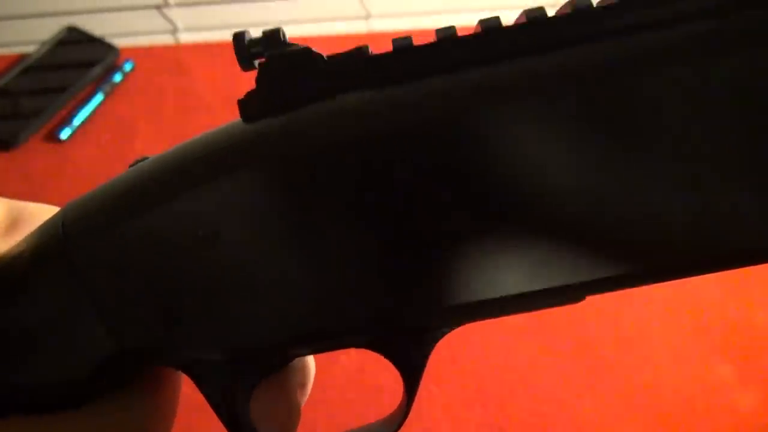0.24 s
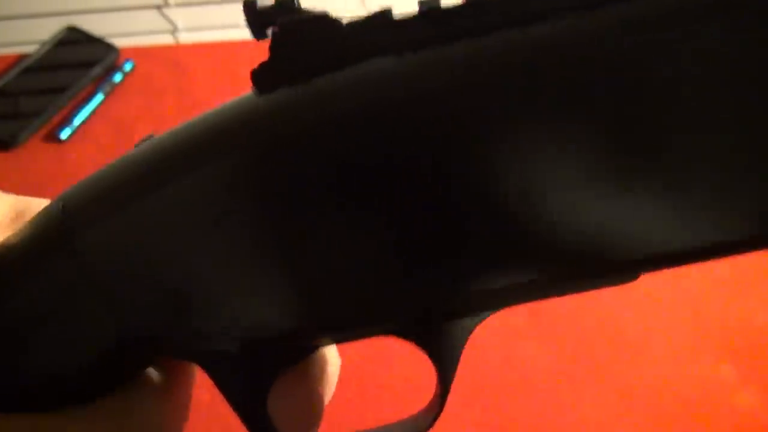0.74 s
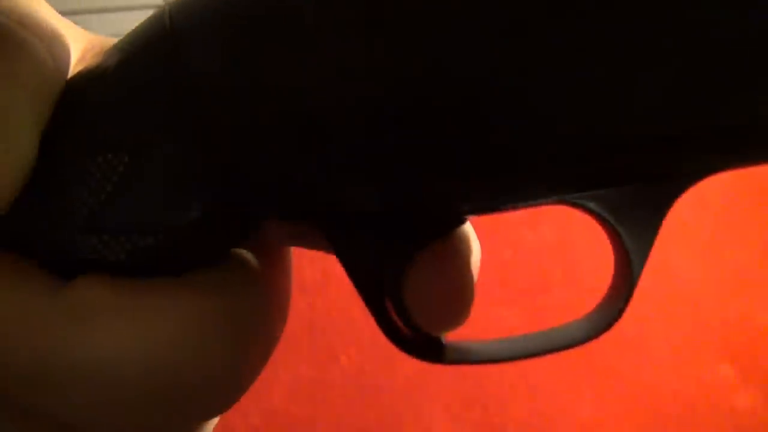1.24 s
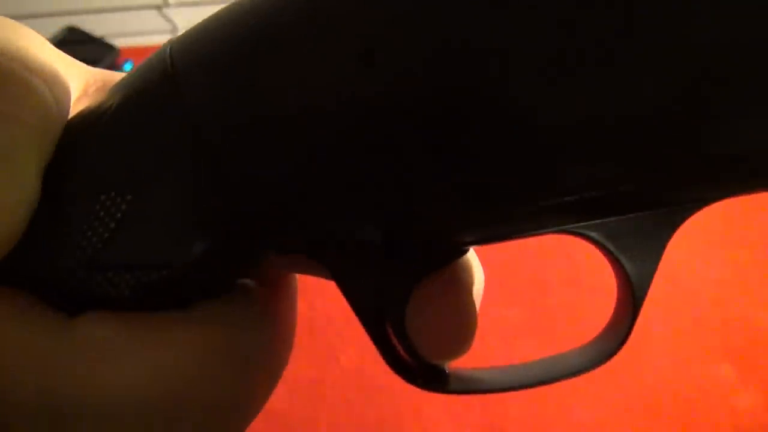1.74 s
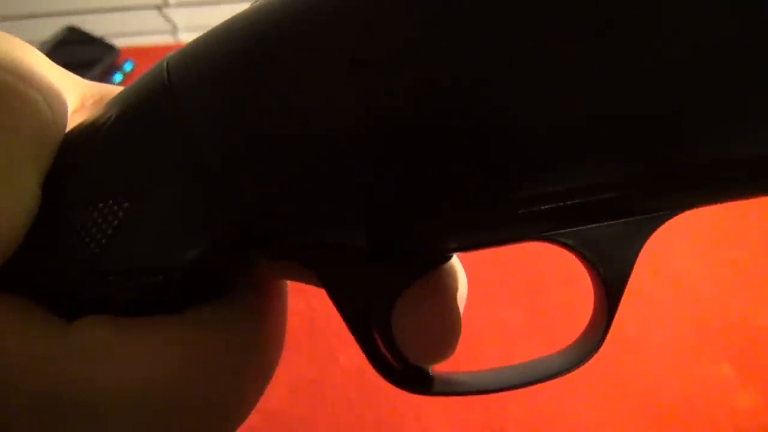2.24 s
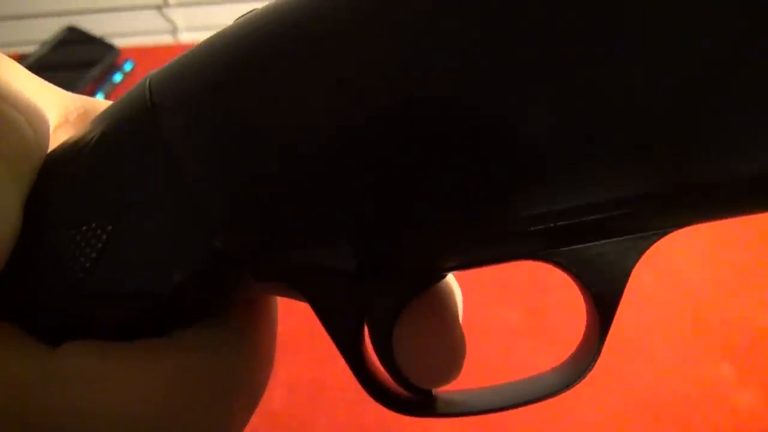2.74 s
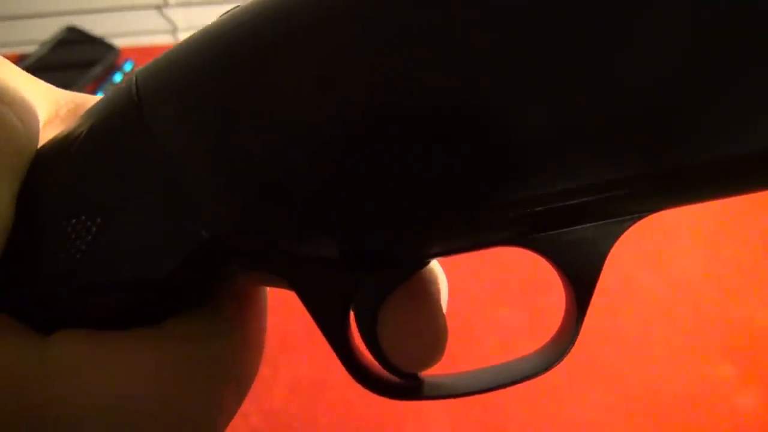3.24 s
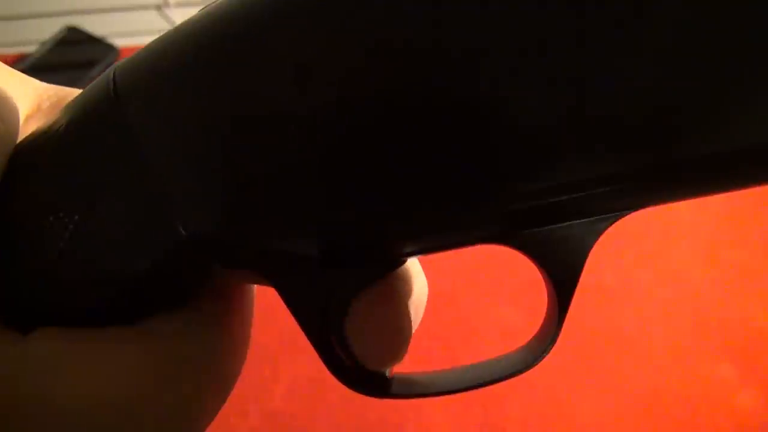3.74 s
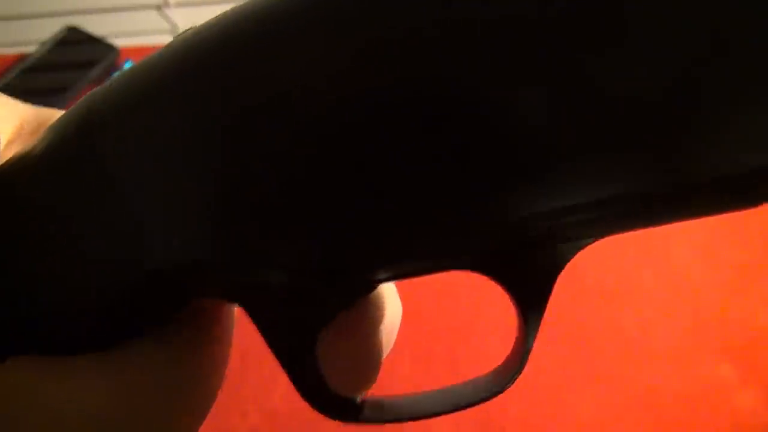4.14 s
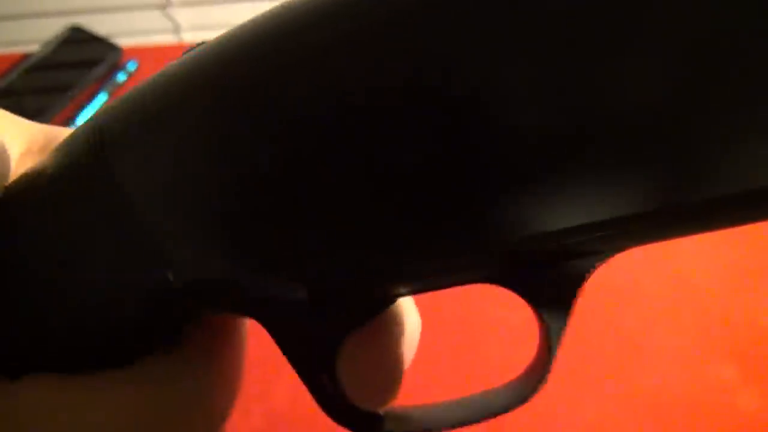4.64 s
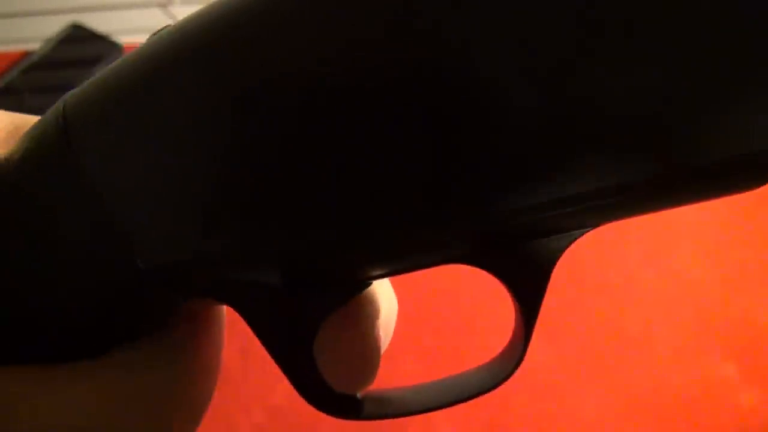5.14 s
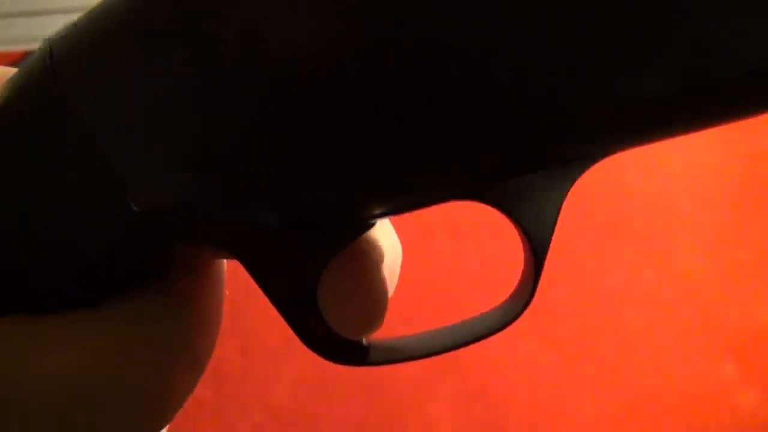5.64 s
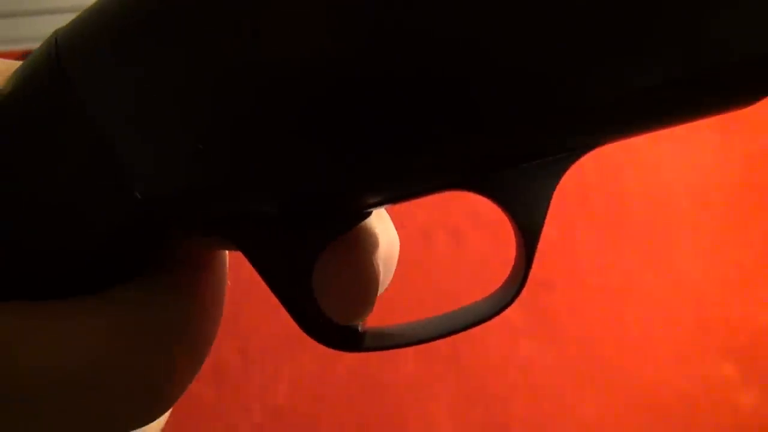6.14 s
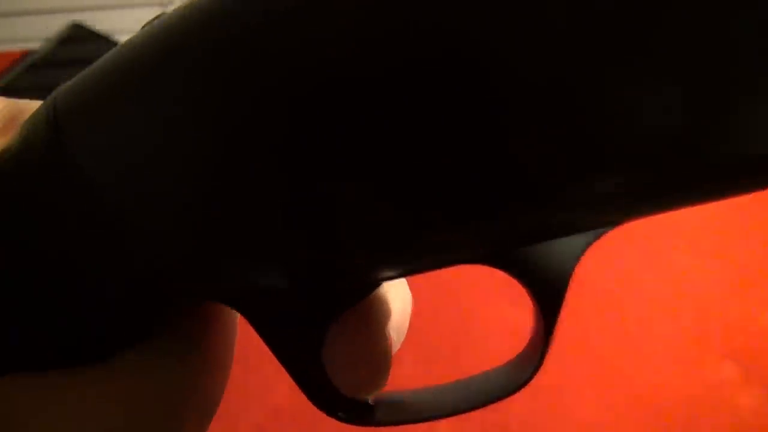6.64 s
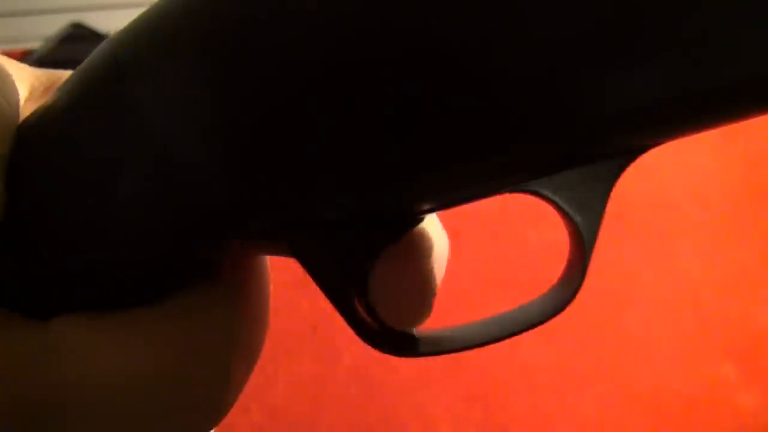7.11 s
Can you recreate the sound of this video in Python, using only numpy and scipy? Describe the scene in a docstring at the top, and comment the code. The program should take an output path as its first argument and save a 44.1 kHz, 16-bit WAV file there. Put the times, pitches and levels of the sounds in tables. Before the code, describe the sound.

A pump-action shotgun is handled close to a phone in a small hard room with a faint noise floor. After tiny finger taps, the first rack begins at 0.2 s: rattling catches and a grainy scrape, a rear slam at 0.4, a tick at 0.5, then a forward run locking with a bright ping at 0.67. Steel and room ring away into quiet. At 2.9 a very short, crisp safety click; a soft bump at 3.5, then at 3.7 the hammer falls on an empty chamber, a hard, ringing clack. The second rack runs from 4.15, slamming back at 4.4 and locking at 4.7. A safety click comes at 5.7, light taps at 5.9, another hammer fall at 6.04. The last rack is slower: unlocking at 6.5, rear slam at 6.8, lock at 7.27. Dense echo follows each blow; the loudest hits sound flattened.

```python
"""A pump-action shotgun is racked three times and, in between, twice taken off safe and dry-fired in a small
hard room, close to a phone. Catches tick and knock, the bolt slams back and locks forward, the hammer falls:
bursts of coloured, fast-decaying noise. The fore-end rubs its tube as a grainy hiss, steel and room modes ring
as damped sines, and a dense echo answers over a faint noise floor. The phone's limiter flattens the loud blows."""
import sys
import numpy as np
from scipy import signal
from scipy.fft import rfft, irfft, next_fast_len
from scipy.io import wavfile
from scipy.ndimage import uniform_filter1d

SR = 44100
rng = np.random.default_rng(int(sys.argv[2]) if len(sys.argv) > 2 else 0)


def transcribe(signal):
    """Save signal, clipped to [-1, 1], as a 16-bit WAV file at the path in sys.argv[1]."""
    frames = np.atleast_2d(signal).T
    limited = np.clip(frames, -1, 1)
    pcm = np.round(limited * 32767).astype(np.int16)
    wavfile.write(sys.argv[1], SR, pcm)


N = 325235
ATTACK = int(.005 * SR)  # the 5 ms over which a contact's level is set
BLOW = np.arange(8192) / SR  # time axis of one contact, in seconds


def undb(db):
    """Decibels to gain."""
    return 10 ** (np.asarray(db) / 20)


def fade(t, t60):
    """Exponential decay that loses 60 dB in t60 seconds."""
    return np.exp(-np.log(1000) * t / max(abs(t60), 1e-3))


def gains(points, n):
    """A colour curve of (Hz, dB) points as gains on the bins of an n-point spectrum."""
    hz, db = np.transpose(points)
    bins = np.log(np.fft.rfftfreq(n, 1 / SR) + 1)
    return undb(np.interp(bins, np.log(hz), db))


# Stereo width. Each row: frequency in Hz, side over mid in dB.
STEREO_WIDTH = [(50, -0.5), (150, -9.5), (350, -15.5), (900, -21), (1500, -18), (2800, -22), (4500, -15.5),
                (7000, -5.5), (9500, -7), (13000, -22.5)]


def noise(points, n):
    """Coloured stereo noise of rms 1, as wide as the two microphones hear it."""
    mid, side = rfft(rng.standard_normal((2, n))) * gains(points, n)
    side = side * gains(STEREO_WIDTH, n)
    x = irfft(np.array([mid + side, mid - side]), n)
    return x / x.std()


def add(out, s, x):
    """Mix x into out from time s (seconds) on."""
    i = max(int(s * SR), 0)
    out[..., i:i + x.shape[-1]] += x[..., :max(N - i, 0)]


def mode(hz, t60):
    """One damped resonance: a decaying sine."""
    t = np.arange(32768) / SR
    return fade(t, t60) * np.sin(2 * np.pi * hz * t)


def burst(points, t60, rise_s=0.00042, damping=3):
    """A contact: countless damped modes, with the energy of a decay whose first 5 ms have rms 1."""
    shape = fade(BLOW, t60) * (1 - np.exp(-BLOW / rise_s))
    shape = shape / np.sqrt(np.mean(shape[:ATTACK] ** 2))
    # the modes have random phases, but their strengths follow the colour of the contact
    phases = np.angle(rfft(noise(points, len(BLOW)) * shape))
    x = irfft(gains(points, len(BLOW)) * np.exp(1j * phases))
    x = x * fade(BLOW, damping * t60)
    energy = np.sum(np.mean(x ** 2, axis=0))
    return x * np.sqrt(np.sum(shape ** 2) / energy)


def stress(x, hz, width_hz, lift_db):
    """Lift one resonance of a sound and keep its energy."""
    b, a = signal.iirpeak(hz, hz / width_hz, fs=SR)
    y = x + undb(lift_db) * signal.lfilter(b, a, x)
    return y * x.std() / y.std()


# Colour of the noise floor. Each row: frequency in Hz, relative level in dB.
FLOOR_COLOUR = [(12, -37), (20, -13), (112, -3.5), (144, -7.5), (196, -2), (298, -8), (342, -3.5),
                (478, -11), (985, -16.5), (1500, -11.5), (1720, -18), (2400, -19), (3080, -22.5),
                (3450, -22.5), (15500, -25)]


def quiet_floor(level_db=-59.5):
    """The steady background: faint coloured noise."""
    return undb(level_db) * noise(FLOOR_COLOUR, next_fast_len(N))[:, :N]


# The room's echo by band. Each row: centre in Hz, echo gain in dB, t60 in seconds.
ROOM_BANDS = [(60.3, -21, .3), (166, -13, 0.15), (308, 4, 0.46), (570.4, 4, 0.51), (1230, 0, 0.47),
              (2430, -1, 0.42), (4904, -1, 0.48), (9000, -1, 0.31), (14900, -4, 0.068)]


def room(x, build_s=0.0028, size=32768):
    """A dense echo that builds as the walls answer; each band dies at its own pace, the very top first."""
    t = np.arange(size) / SR
    centres = np.log([row[0] for row in ROOM_BANDS])
    bins = np.log(np.fft.rfftfreq(size, 1 / SR) + 1)
    white = rfft(noise([(1, 0), (SR, 0)], size))
    echo = 0
    for band, (_, db, t60) in zip(np.eye(len(ROOM_BANDS)), ROOM_BANDS):
        shape = fade(t, t60) * (1 - np.exp(-(t / build_s) ** 2))
        shape = shape / np.linalg.norm(shape)
        band_noise = irfft(white * np.interp(bins, centres, band))
        echo = echo + undb(db) * band_noise * shape
    mono = x.mean(axis=0)[None]
    return signal.fftconvolve(mono, echo, axes=1)[:, :N]


# Low room modes set off around unlocking and locking. Each row: start in seconds, note in Hz, level in dB.
ROOM_BOOMS = [(0.236, 319, -27), (.70, 351.3, -21), (4.201, 324, -30.5), (4.742, 351, -21),
              (6.515, 316, -40.5), (7.292, 346.5, -21.5)]


def room_booms(t60=.3, swell_t60=0.032):
    """The room's low modes swell up and ring on around unlocking and locking."""
    out = np.zeros(N)
    for s, hz, db in ROOM_BOOMS:
        # a shorter copy taken away leaves a soft onset
        add(out, s, undb(db) * (mode(hz, t60) - mode(hz, swell_t60)))
    return out


# The hands bump softly on the stock. Each row: start in seconds, note in Hz, level in dB.
STOCK_BUMPS = [(1.335, 333, -53.5), (3.507, 380, -43), (5.857, 208, -42)]


def bumps(t60=0.047):
    """Dull, short notes of the stock under the hands."""
    out = np.zeros(N)
    for s, hz, db in STOCK_BUMPS:
        add(out, s, undb(db) * mode(hz, t60))
    return out


# Colour of the pushed air. Each row: frequency in Hz, relative level in dB.
THUMP_COLOUR = [(15, -11), (35, 0), (80, -10), (160, -12.5), (300, -22), (800, -56.5)]


def thumps(t60=0.016, catch_db=-30):
    """Each jolt of the gun pushes the air beside the phone: hard at the heavy blows, slightly at every catch."""
    out = np.zeros((2, N))
    for s, _, _, jolt_db, *_ in HAMMER_FALLS + REAR_STOPS + LOCKUPS:
        add(out, s, undb(jolt_db) * burst(THUMP_COLOUR, t60))
    for s, db, *_ in contacts():
        add(out, s, undb(db + catch_db) * burst(THUMP_COLOUR, t60))
    return out


# Colour of the sliding fore-end. Each row: frequency in Hz, relative level in dB.
SCRAPE_COLOUR = [(20, -31), (120, -24.5), (330, -12), (600, -13.5), (1100, -4.5), (1600, -4.5),
                 (2300, -0.5), (3000, 0), (4200, -9.5), (6000, -6.5), (9000, -19.5)]


def slide(rate=700, spread_db=6, grain_t60=0.0089, treble_db=-10):
    """Steel scrapes on steel: dense tiny slips of uneven size, about rate per second."""
    sizes = undb(spread_db * np.minimum(rng.standard_normal(N), 2))
    slips = (rng.random(N) < rate / SR) * sizes
    grain = signal.fftconvolve(slips, fade(BLOW, grain_t60))[:N]
    grain = grain / np.sqrt(np.mean(grain ** 2))
    size = next_fast_len(N)
    scrape = noise(SCRAPE_COLOUR, size) + undb(treble_db) * noise(SMALL_PARTS_COLOUR, size)
    return scrape[:, :N] * grain * rubbing()


def swell(start, length, rise_t60, fall_t60):
    """An envelope that rises up to start, holds for length and dies away."""
    t = np.arange(N) / SR - start
    return fade(np.maximum(-t, 0), rise_t60) * fade(np.maximum(t - length, 0), fall_t60)


def rubbing(rise_t60=0.053, fall_t60=0.21, rear_db=-14, rear_hold_s=0.042, rear_t60=0.26,
            lock_db=-11, lock_hold_s=0.047, lock_t60=0.096):
    """How hard the fore-end rubs its tube: steadily through each movement, with a surge at each end stop."""
    power = np.zeros(N)
    for start, end, *_, scrape_db in UNLOCK_MOVES + PULL_MOVES + LIFT_MOVES + PUSH_MOVES:
        power += (undb(scrape_db) * swell(start, end - start, rise_t60, fall_t60)) ** 2
    surges = ((REAR_STOPS, rear_db, rear_hold_s, rear_t60), (LOCKUPS, lock_db, lock_hold_s, lock_t60))
    for stops, share_db, hold_s, t60 in surges:
        for s, db, *_ in stops:
            power += (undb(db + share_db) * swell(s, hold_s, rise_t60, t60)) ** 2
    return np.sqrt(power)


# The safety snaps over. Each row: start in seconds, level in dB, nominal t60 of the crack in seconds,
# ring of the receiver in dB.
SAFETY_SNAPS = [(2.9354, -13, .004, -68), (5.7122, -17, .009, -53)]
# Colours of the crack and of the parts that shiver around it. Each row: frequency in Hz, relative level in dB.
SAFETY_COLOUR = [(300, -53), (620, -31), (850, -3.5), (1700, -17.5), (3300, -1), (4200, -6), (5100, 5.5),
                 (6000, -5), (7200, 9.5), (9100, -1), (10200, 10.5), (11200, 10), (12500, 3),
                 (15500, -10.5)]
SHIVER_COLOUR = [(300, -43), (700, -17), (950, -7.5), (1600, -4), (3200, -5.5), (5100, -2), (7200, -2.5),
                 (9500, -9.5), (15500, -11.5)]


def safety(ring_hz=1055, ring_t60=0.89, shiver_db=-14, shiver_t60=0.081):
    """A detent snaps: a very short crack; the parts around it shiver and the receiver rings faintly."""
    cracks, shivers = np.zeros((2, 2, N))
    for s, db, t60, ring_db in SAFETY_SNAPS:
        add(cracks, s, undb(db) * burst(SAFETY_COLOUR, t60, damping=14.0))
        add(shivers, s, undb(db + shiver_db) * burst(SHIVER_COLOUR, shiver_t60))
        add(shivers, s, undb(ring_db) * mode(ring_hz, ring_t60))
    return cracks, shivers


# Every racking is the same four movements: unlock, pull back, tip the carrier, push forward.
# Each movement trips the same catches in the same order; only its speed and force differ.
# Each row: start in seconds, end in seconds, force in dB, easing (under 1 speeds up), scrape in dB.
UNLOCK_MOVES = [(0.2072, .2508, 1.2, .92, -24), (4.1588, 4.2035, 1, 1.13, -25),
                (6.4765, 6.5251, -2.2, 1.0, -34.5)]
PULL_MOVES = [(0.289, 0.3658, 0.28, 0.97, -29), (4.2756, 4.348, 1.7, .76, -39.5),
              (6.6752, 6.7646, -1.5, 1.06, -34)]
LIFT_MOVES = [(.386, 0.398, -1, 1.0, -26.5), (4.368, 4.382, 1.5, 0.93, -25),
              (6.7856, 6.809, -1.2, 0.98, -22.5)]
PUSH_MOVES = [(0.5568, 0.6548, 0.012, .9, -27.5), (4.5517, 4.6847, 0.00098, 1.04, -28.5),
              (7.1102, 7.2482, 0.0047, 1.01, -30)]
# Catches along each movement. Each row: relative place from start to end, level in dB before force,
# treble over body in dB, nominal t60 in seconds, nominal note in Hz, ping in Hz.
CATCHES_UNLOCKING = [(0, -12.5, -5, 0.028, 1800, 6300), (.22, -15.5, 1, 0.02, 1900, 11200),
                     (0.461, -15, 6, 0.019, 1660, 9900), (.78, -19, 3.5, .022, 1600, 9600),
                     (1.001, -19, -3, .013, 1700, 7000)]
CATCHES_PULLING = [(0, -15.5, 1, 0.014, 2640, 9500), (.296, -15.5, 8, .012, 1883, 10050),
                   (.525, -19.5, -12.5, 0.014, 2670, 6000), (.79, -17.5, 12.5, .009, 2490, 10400),
                   (0.999, -16, 18, 0.0068, 2820, 8140)]
CATCHES_LIFTING = [(0, -20.5, -8.5, .015, 2090, 6100), (.53, -15, 0, .028, 2400, 10500),
                   (1, -14.5, -2, .022, 2200, 7000)]
CATCHES_PUSHING = [(0, -15, 0.5, 0.044, 2100, 7000), (.23, -15.5, -5, 0.014, 1100, 11000),
                   (.38, -22, 4, .018, 2600, 10300), (.595, -16.5, -4, 0.012, 2250, 11000),
                   (.738, -17.5, 2, .011, 2550, 6200), (1.001, -11.5, -9, .01, 2300, 6000)]
# Trigger, sear and strut let go just before the hammer lands. Each row: lead in seconds, level in dB,
# treble over body in dB, nominal t60 in seconds, nominal note in Hz, ping in Hz.
TRIGGER_RELEASE = [(0.02, -29.5, -25.5, 0.02, 1200, 5300), (.0075, -20.5, -8, .03, 930, 6300),
                   (.0036, -7.5, 5.5, 0.015, 1170, 12000)]
# Lone taps of fingers and loose parts. Each row: start in seconds, level in dB, treble over body in dB,
# nominal t60 in seconds, nominal note in Hz, ping in Hz.
LONE_TAPS = [(.054, -44, -23.5, .014, 2400, 3600), (.147, -46, -14, 0.025, 1530, 6000),
             (.5098, -16.5, -3, 0.0092, 2120, 5980), (1.335, -60, -20, 0.012, 900, 6000),
             (3.5063, -50.5, -22, .012, 700, 6000), (4.093, -30, -35.5, 0.0095, 960, 5940),
             (5.8936, -38, -29, 0.0051, 1050, 5500), (5.9132, -41, -3, .0075, 2230, 5500),
             (6.6324, -34, -9, 0.064, 1140, 6120), (7.07, -26, -22, .02, 1880, 6000)]


def contacts():
    """Every snap of a small part: (s, level dB, treble over body dB, nominal t60 s, note Hz, ping Hz)."""
    rows = list(LONE_TAPS)
    strokes = ((UNLOCK_MOVES, CATCHES_UNLOCKING), (PULL_MOVES, CATCHES_PULLING),
               (LIFT_MOVES, CATCHES_LIFTING), (PUSH_MOVES, CATCHES_PUSHING))
    for movements, catches in strokes:
        places = np.array([row[0] for row in catches])
        for start, end, force_db, easing, _ in movements:
            times = start + (end - start) * (places / places[-1]) ** easing
            for s, (_, db, *tone) in zip(times, catches):
                rows.append((s, db + force_db, *tone))
    for s, *_ in HAMMER_FALLS:
        for lead, *sound in TRIGGER_RELEASE:
            rows.append((s - lead, *sound))
    return rows


# Colours of the knock on the receiver and of the small parts. Each row: frequency in Hz, relative level in dB.
BODY_COLOUR = [(20, -32.5), (90, -20.5), (200, -16), (340, -6.5), (500, -11.5), (700, -4), (1100, 0),
               (1900, 0.5), (2800, 0.5), (4200, -10), (6000, -4.5), (9000, -26)]
SMALL_PARTS_COLOUR = [(1500, -25.5), (3500, -19.5), (5200, -1), (7300, -0.5), (8800, -4.5), (10500, -5),
                      (12500, -5), (15500, -21)]


def clacks(body_stretch=3.2, tick_stretch=1.0, body_db=-3.5, note_db=-2, note_t60=0.028, note_scatter=.05,
           note_width_hz=500, note_lift_db=0, tick_db=1.0, ping_width_hz=700, ping_lift_db=8):
    """Small parts tick around their ping, knock on the receiver and sound a note; returns ticks and knocks."""
    ticks, knocks = np.zeros((2, 2, N))
    for s, db, treble_db, t60, hz, ping_hz in contacts():
        body = undb(db) / np.hypot(1, undb(treble_db))  # body and treble share the level
        note = hz * (1 + note_scatter * rng.standard_normal())
        knock = burst(BODY_COLOUR, t60 * body_stretch, rise_s=0.00022)
        knock = stress(knock, note, note_width_hz, note_lift_db)
        tick = burst(SMALL_PARTS_COLOUR, t60 * tick_stretch, rise_s=0.00038)
        tick = stress(tick, ping_hz, ping_width_hz, ping_lift_db)
        add(knocks, s, body * undb(body_db) * knock)
        add(knocks, s, body * undb(note_db) * mode(note, note_t60))
        add(ticks, s, body * undb(treble_db + tick_db) * tick)
    return ticks, knocks


def chatter(share_db=-5, t60=.06):
    """Hammer and rear stop shake the loose small parts."""
    out = np.zeros((2, N))
    for s, db, *_ in HAMMER_FALLS + REAR_STOPS:
        add(out, s, undb(db + share_db) * burst(SMALL_PARTS_COLOUR, t60, rise_s=0.00077))
    return out


def lug(hz=10960, t60=.06):
    """The locking lug pings briefly as it snaps into place."""
    out = np.zeros(N)
    for s, *_, ping_db in LOCKUPS:
        add(out, s, undb(ping_db) * mode(hz, t60))
    return out


# What receiver and barrel ring with. Each row: frequency in Hz, relative level in dB, t60 in seconds.
STEEL_MODES = [(355, -34.5, 0.69), (616, -33, 0.51), (753, -30.5, 0.32), (817, -30.5, 0.5),
               (931, -41.5, 1.7), (1069, -30.5, 0.76), (1136, -26, 0.86), (1224, -27, 0.41),
               (1410, -29.5, 0.26), (1457, -28, 0.33), (1587, -25, 0.52), (1892, -27.5, .3),
               (2917, -31, .22), (3580, -30.5, .3), (5360, -38.5, .35), (6250, -32.5, .25)]


def ring(size=65536, scatter_db=2.0):
    """The steel's long modes; each blow lands elsewhere and weights them anew."""
    t = np.arange(size) / SR
    waves = np.array([undb(db) * fade(t, t60) * np.exp(2j * np.pi * hz * t) for hz, db, t60 in STEEL_MODES])
    out = np.zeros(N)
    for s, db, *_ in HAMMER_FALLS + REAR_STOPS + LOCKUPS:
        strengths = undb(db + scatter_db * rng.standard_normal(len(STEEL_MODES)))
        phases = 2 * np.pi * rng.random(len(STEEL_MODES))
        add(out, s, ((strengths * np.exp(1j * phases)) @ waves).imag)
    return out


# The hammer falls on an empty chamber; the bolt hits its rear stop and rebounds.
# Each row: start in seconds, level in dB, nominal t60 in seconds, jolt in dB.
HAMMER_FALLS = [(3.6909, -6.5, 0.13, -14), (6.0397, -6.5, 0.084, -16.5)]
REAR_STOPS = [(0.404, -7.5, 0.095, -31.5), (0.4169, -7.5, 0.049, -30.5), (4.387, -12, 0.087, -25.5),
              (4.4001, -8.5, 0.14, -38), (6.817, -13, 0.084, -33), (6.832, -8.5, 0.1, -31)]
# The bolt runs home and locks. Each row: start in seconds, level in dB, nominal t60 in seconds, jolt in dB,
# ping of the locking lug in dB.
LOCKUPS = [(.663, -16, .06, -39, -35), (.672, -6.5, 0.079, -37, -1), (4.696, -14.5, 0.063, -46, -42),
           (4.711, -9, 0.059, -42, -29), (7.261, -15.5, 0.062, -43, -28.5), (7.278, -10.5, 0.055, -35, -18)]
# Colours of the three blows. Each row: frequency in Hz, relative level in dB.
HAMMER_COLOUR = [(88, -72.5), (150, -37.5), (308, -27.5), (381, -22.5), (708, -30), (844, -4.5), (948, -11),
                 (1090, -3), (1540, -15), (1800, -8.5), (1940, -14), (3550, -11.5), (4390, -19),
                 (9730, -13), (15500, -25)]
REAR_COLOUR = [(88, -50), (150, -15), (618, -15.5), (708, -13), (894, -4), (966, -8.5), (1220, -2.5),
               (1760, -3), (1910, -3), (2500, -8.5), (5870, -10), (11400, -14), (15500, -24)]
LOCK_COLOUR = [(88, -52), (150, -20.5), (346, -7), (668, -10.5), (736, -3.5), (930, -8), (1600, -1.5),
               (1800, -3), (4560, -8), (6350, -4), (10300, -13.5), (11100, -7.5), (15500, -21.5)]


def slams(rows, colour):
    """Heavy blows: a crash of steel on steel."""
    out = np.zeros((2, N))
    for s, db, t60, *_ in rows:
        add(out, s, undb(db) * burst(colour, t60, rise_s=0.00087))
    return out


# Balance of the microphones. Each row: frequency in Hz, left over right in dB.
LEFT_OVER_RIGHT = [(100, -1.5), (400, .5), (700, 1.5), (1300, -1.5), (3000, -0.5), (6000, -0.5), (10000, 0)]


def microphones(x):
    """The two microphones differ a little in colour."""
    size = next_fast_len(N)
    left = np.sqrt(gains(LEFT_OVER_RIGHT, size))
    return irfft(rfft(x, size) * np.array([left, 1 / left]), size)[:, :N]


def scene(tick_room_db=-11, knock_room_db=-4, slam_room_db=1, safety_room_db=-7, ring_db=-1):
    """The gun over a quiet room; the small parts are near the phone, so their ticks send little to the room."""
    ticks, knocks = clacks()
    ticks = ticks + chatter() + lug()
    knocks = knocks + slide()
    cracks, shivers = safety()
    heavy = slams(HAMMER_FALLS, HAMMER_COLOUR) + slams(REAR_STOPS, REAR_COLOUR) + slams(LOCKUPS, LOCK_COLOUR)
    to_room = undb(tick_room_db) * ticks + undb(knock_room_db) * knocks
    to_room = to_room + undb(safety_room_db) * shivers + undb(slam_room_db) * heavy
    gun = ticks + knocks + cracks + shivers + heavy
    gun = gun + thumps() + bumps() + undb(ring_db) * ring()
    return microphones(gun + room_booms() + room(to_room) + quiet_floor())


def record(dry, ceiling_db=-10, attack_s=.003, release_db_per_s=170, size=89, top_hz=16000):
    """The phone's limiter ducks fast and recovers slowly; peaks that slip through are rounded, the top is cut."""
    power = uniform_filter1d(np.mean(dry ** 2, axis=0), size)
    over = np.maximum(10 * np.log10(np.abs(power) + 1e-12) - ceiling_db, 0)
    # the reduction in dB jumps up with the level and falls back at a steady rate
    recovery = release_db_per_s * np.arange(N) / SR
    duck = np.maximum.accumulate(over + recovery) - recovery
    pole = np.exp(-1 / (attack_s * SR))
    smooth_duck = signal.lfilter([1 - pole], [1, -pole], duck)
    limited = np.tanh(dry * undb(-smooth_duck))
    return signal.sosfilt(signal.ellip(10, .2, 70, top_hz, fs=SR, output="sos"), limited)


dry = scene()
out = record(dry)
transcribe(out)
```